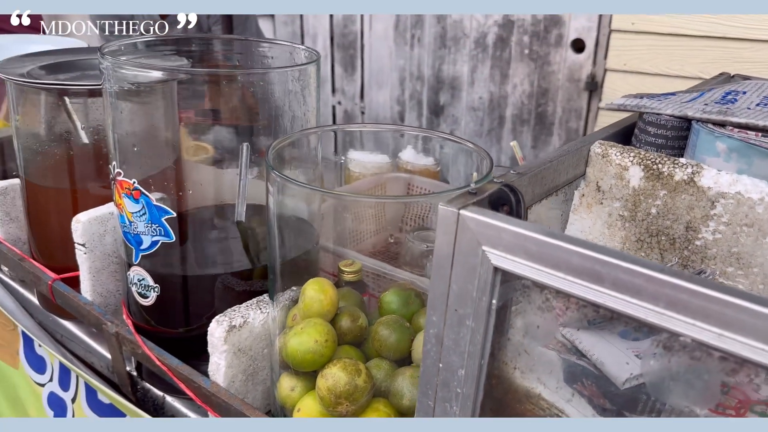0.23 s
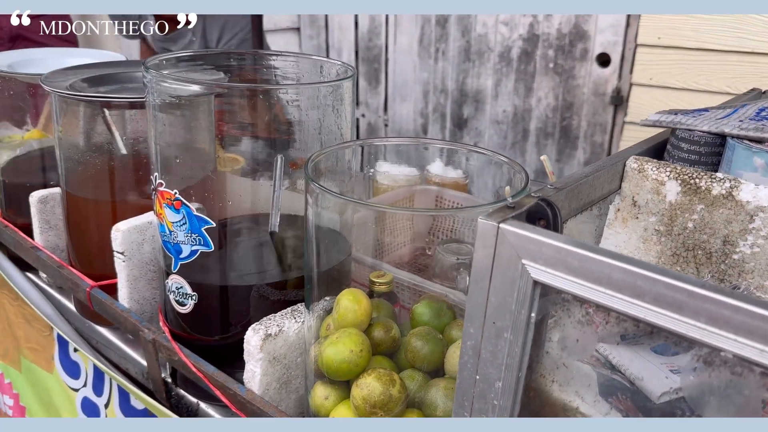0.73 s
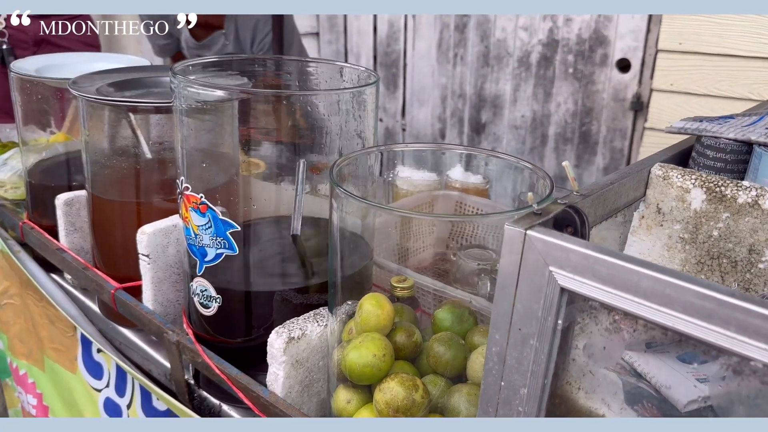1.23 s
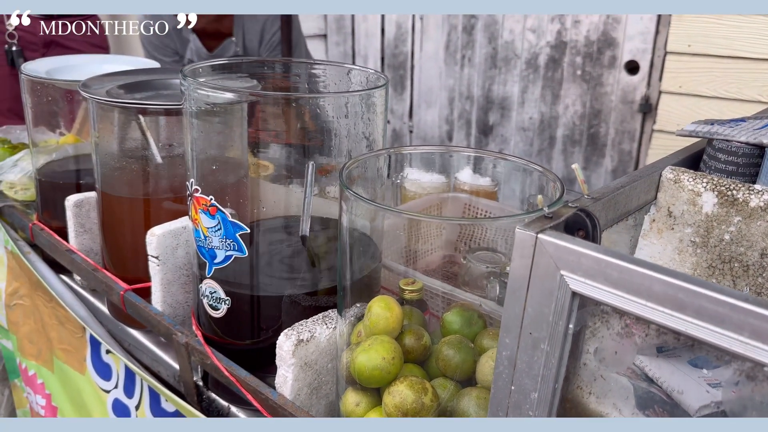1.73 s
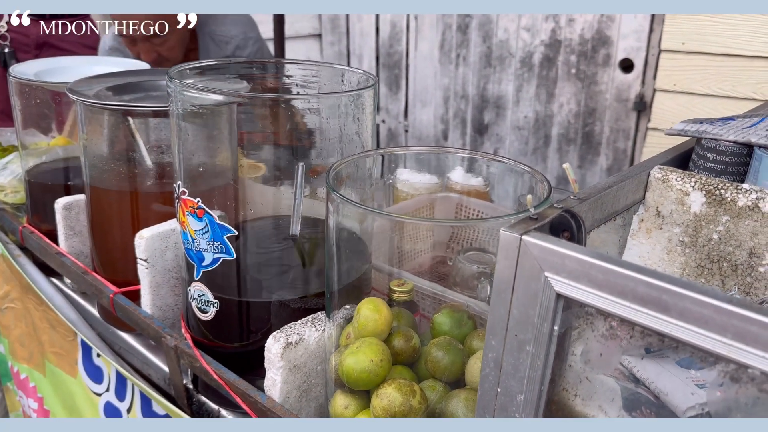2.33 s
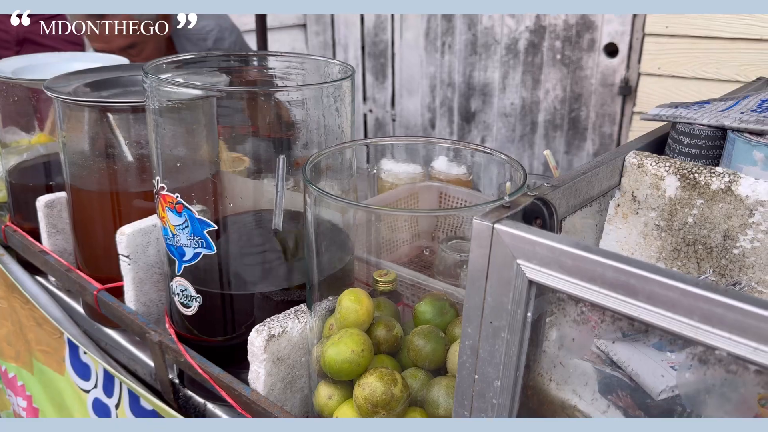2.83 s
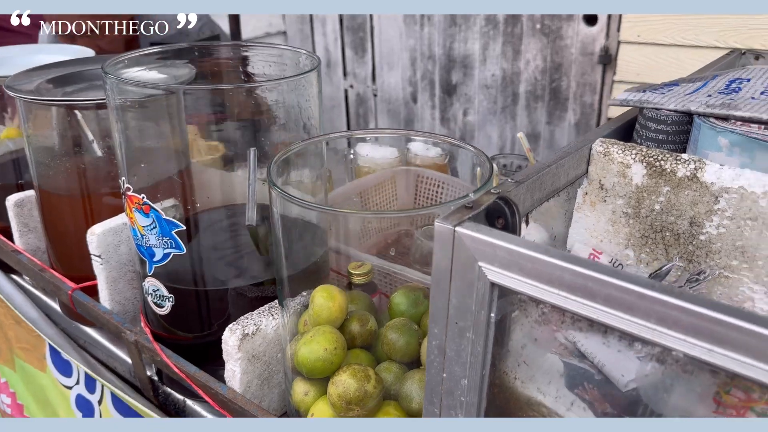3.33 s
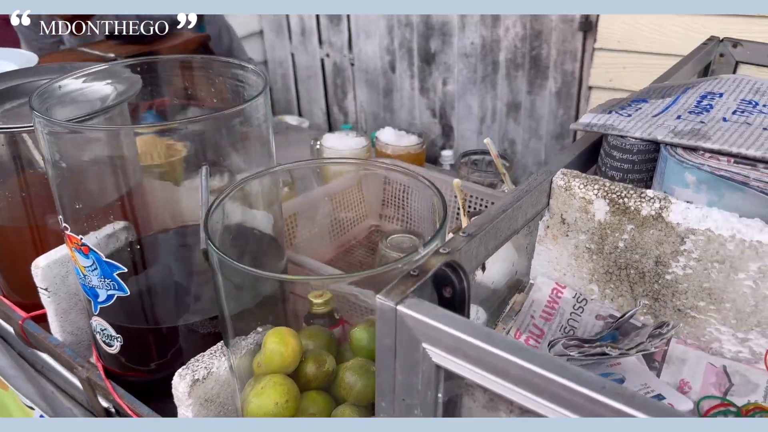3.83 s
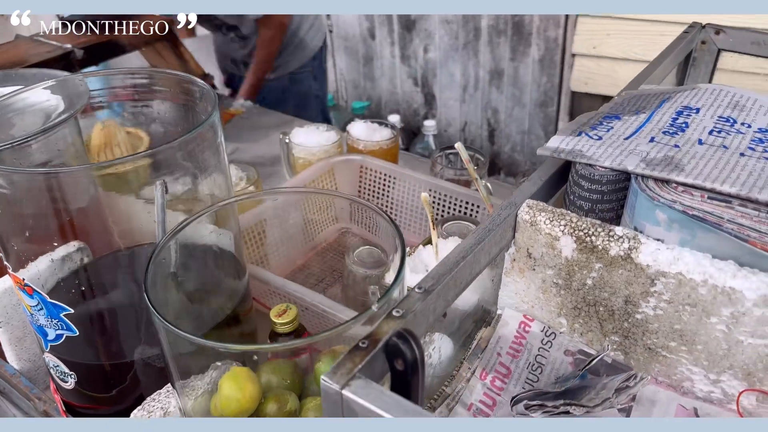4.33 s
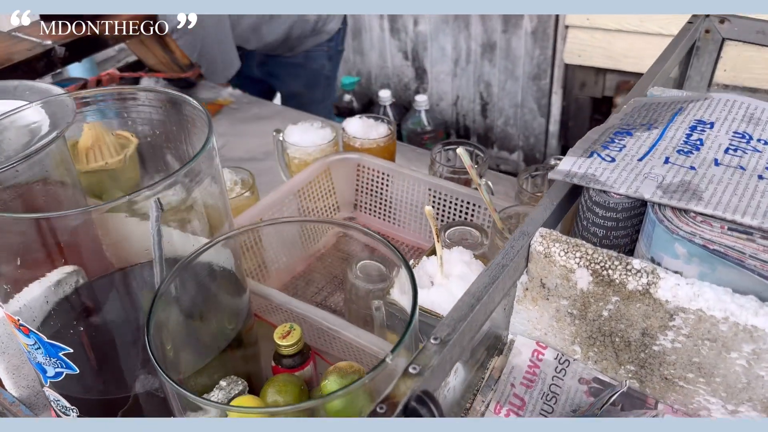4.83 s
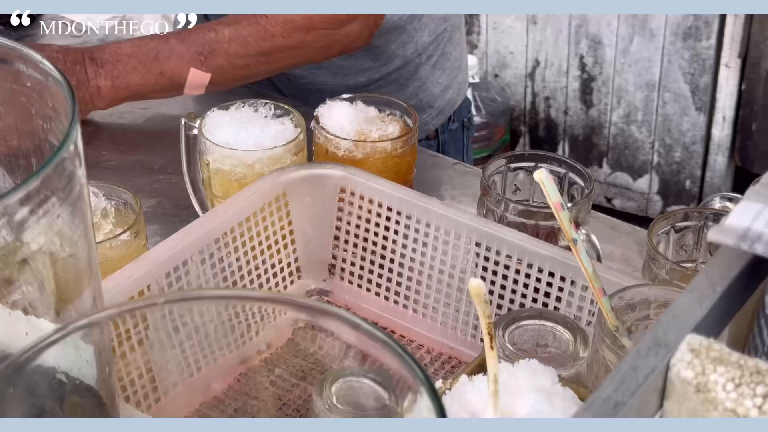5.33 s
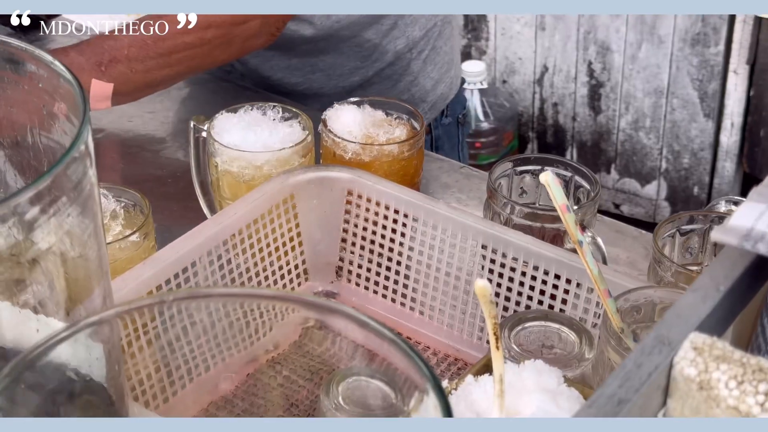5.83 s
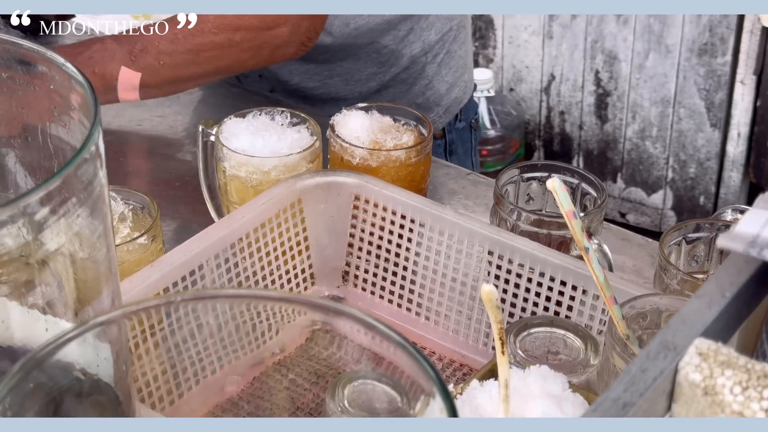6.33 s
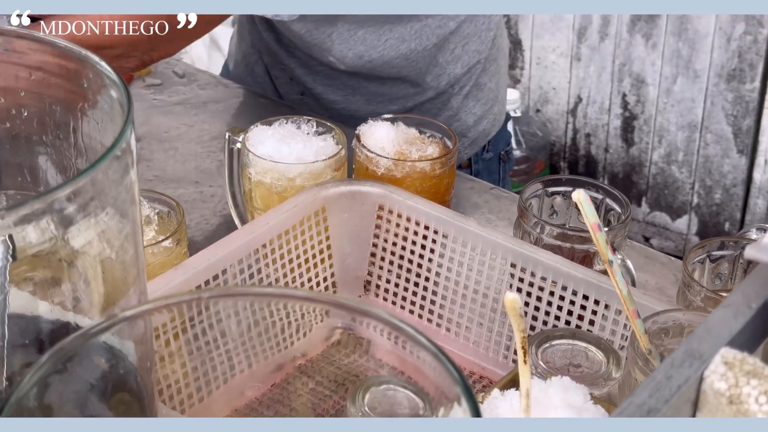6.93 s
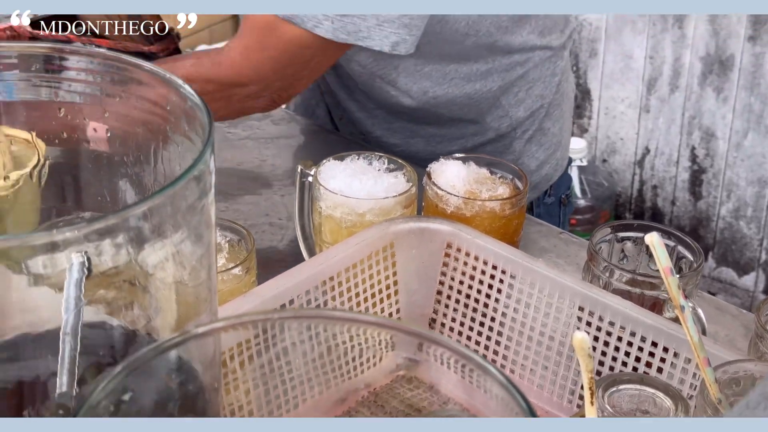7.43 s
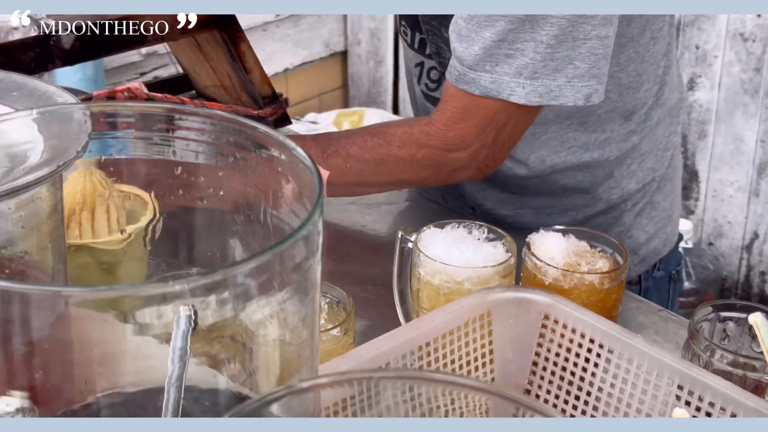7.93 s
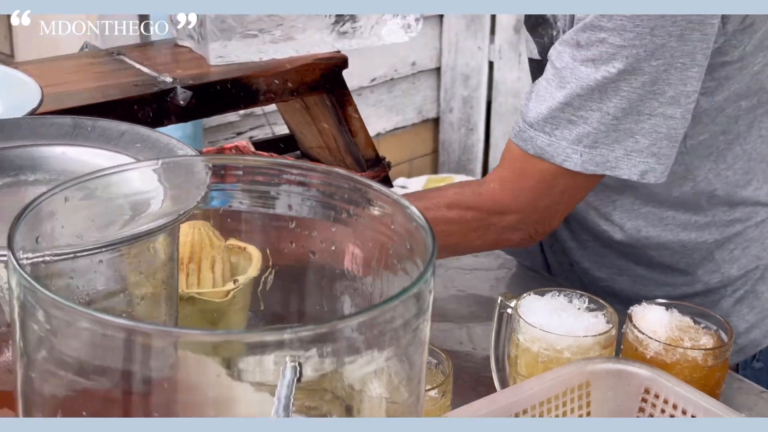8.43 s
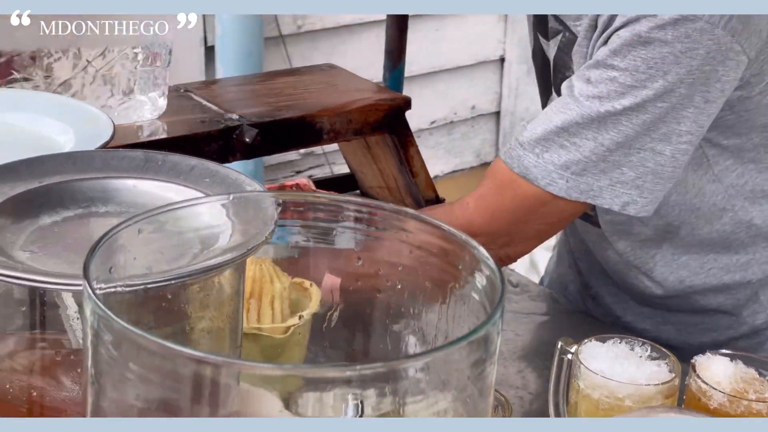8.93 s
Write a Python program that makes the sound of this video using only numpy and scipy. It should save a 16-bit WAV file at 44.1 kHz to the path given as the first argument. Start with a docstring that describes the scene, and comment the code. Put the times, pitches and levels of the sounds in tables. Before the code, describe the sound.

Street roar and tyre hiss with small ticks and knocks, then four harsh scraping pushes of ice over a wooden plane, lighter slides between.

```python
"""A street is heard first: roar and tyre hiss over a low rumble, a far motor, a few small ticks, knocks, scuffs.
Then, at a roadside drink stall, a block of ice is shaved by hand on a wooden plane: four hard pushes over
the blade, with lighter slides back between them. Street and bench are coloured noise; the ice is a dense
train of tiny fractures that rings the plank and throws off a bright spray of chips."""
import sys
import numpy as np
from scipy import signal
from scipy.fft import rfft, irfft
from scipy.io import wavfile

SR = 44100
rng = np.random.default_rng(int(sys.argv[2]) if len(sys.argv) > 2 else 0)


def dump_mix(stems):
    """Bounce the given channels to the path in sys.argv[1] as a 16-bit WAV at rate SR."""
    frames = np.atleast_2d(stems).T  # one column per channel
    limited = np.clip(frames, -1, 1)  # hard clip at full scale
    pcm = np.round(limited * 32767).astype(np.int16)
    wavfile.write(sys.argv[1], SR, pcm)


N = 404838
TIME, BINS = np.arange(N) / SR, np.fft.rfftfreq(N, 1 / SR)  # seconds, Hz


def amp(db):
    """Turns dB into a gain."""
    return 10 ** (np.asarray(db) / 20)


def unit(x):
    """Scales to rms 1."""
    return x / np.sqrt(np.mean(x ** 2) + 1e-20)


def read(points, hz):
    """Reads a spectrum on a log-frequency axis."""
    f, value = np.transpose(points)
    return np.interp(np.log(hz + 1), np.log(f + 1), value)


def curves(rows):
    """Each column of a table as a curve over the whole time."""
    s, *columns = np.transpose(rows)
    return [np.interp(TIME, s, c) for c in columns]


def latest(rows):
    """At every moment: the age of the latest event of a table, then its other columns."""
    table = np.transpose(rows)
    row = np.maximum(np.searchsorted(table[0], TIME) - 1, 0)
    start, *columns = table[:, row]
    return TIME - start, *columns


def envelope(age, rise, hold, t60):
    """Rises, holds until the given age, then dies away."""
    return np.clip(age / rise, 0, 1) * amp(-60 * np.clip((age - hold) / t60, 0, 2))


def blow(age, t60):
    """Envelope of a blow: at once there, then dying."""
    return (age >= 0) * amp(-60 * np.clip(age / t60, 0, 2))


def swells(rows):
    """Soft arches of level, one for each row."""
    return sum(amp(db) * np.sin(np.pi * np.clip((TIME - s) / length, 0, 1)) for s, length, db in rows)


def colour(x, spectrum):
    """Gives x a spectrum, at rms 1."""
    return unit(irfft(rfft(x) * amp(read(spectrum, BINS)), N))


def noise():
    """White noise, rms 1."""
    return rng.standard_normal(N)


def drift(hz):
    """Slow chance wandering up to a rate, rms 1."""
    return unit(irfft(rfft(noise()) / (1 + (BINS / hz) ** 4), N))


def resonate(x, hz, width):
    """A resonance of gain 1 that follows the curve hz: shift down, smooth, shift back up."""
    turn = np.exp(2j * np.pi * np.cumsum(hz) / SR)
    r = np.exp(-np.pi * width / SR)
    return 2 * (turn * signal.lfilter([1 - r], [1, -r], x / turn)).real


def shifting(x, patchy_db, span_hz, span_s):
    """Random patches of time and frequency swell and fade, so that ever other bands ring out for a moment."""
    z = signal.stft(x, SR, nperseg=512, noverlap=384)[2]
    per_s = np.fft.rfftfreq(z.shape[1], 128 / SR)
    per_hz = np.fft.fftfreq(len(z), SR / 512)[:, None]
    smooth = np.exp(-(per_s * span_s) ** 2 - (per_hz * span_hz) ** 2)
    patches = unit(np.fft.irfft2(np.fft.rfft2(rng.standard_normal(z.shape)) * smooth, z.shape))
    z = z * amp(patchy_db * np.minimum(patches, 2))
    return signal.istft(z, SR, nperseg=512, noverlap=384)[1][:N]


# How alike left and right are in the street. Each row: frequency in Hz, likeness from 0 to 1.
STREET_LIKENESS = [(60, 1), (150, 0.92), (300, 0.59), (700, 0.2), (1400, 0), (7000, 0.3), (8600, 1),
                   (16000, 0.96)]


def wide(spectrum):
    """Restless noise from all around, left and right sharing more or less of it in each band."""
    left, other = (rfft(shifting(noise(), 2.56, 220, 0.053)) for side in range(2))
    same = np.clip(read(STREET_LIKENESS, BINS), -1, 1)
    right = same * left + np.sqrt(1 - same ** 2) * other
    return colour(irfft(np.array([left, right]), N), spectrum)


# Resonances of the far motor's whine. Each row: pitch in Hz, width in Hz, level in dB before the fade.
MOTOR_WHINE = [(491.3, 10.7, -54.5), (1430, 37, -59.5)]
# The motor fades away. Each row: time in seconds, gain in dB before a fixed trim.
MOTOR_FADE = [(0, 4), (3.2, 3.5), (3.7, -1.5), (6, -7)]
WHINE_WIDTH = 0.66  # weight of the whine that is opposite in left and right


def far_motor():
    """Noise through narrow resonances gives an unsteady whine, which fades away."""
    both, apart = (sum(amp(db) * unit(resonate(noise(), np.full(N, hz), width))
                       for hz, width, db in MOTOR_WHINE) for part in range(2))
    whine = both + WHINE_WIDTH * np.outer([1, -1], apart)
    return amp(curves(MOTOR_FADE)[0] + 0.5) * whine


# A low hum that comes and goes. Each row: time in seconds, level in dB, pitch in Hz.
PASSING_HUM = [(3.4, -69, 210), (3.9, -54.5, 209.6), (5.25, -50, 207.9), (6, -65, 211)]


def passing_hum():
    """A sine with slightly wandering pitch and level."""
    hum_db, hum_hz = curves(PASSING_HUM)
    phase = 2 * np.pi * np.cumsum(hum_hz * (1 + 0.0077 * drift(11.1))) / SR
    return amp(hum_db + 0.62 * drift(6)) * unit(np.sin(phase))


# The street's rise and fall. Each row: time in seconds, roar in dB and tyre hiss in dB before fixed trims.
STREET_LEVELS = [(0.0, -44.5, -63), (0.13, -49, -57.5), (0.2, -42, -49.5), (0.72, -39.5, -44),
                 (0.82, -44, -53), (1.5, -45.5, -53), (2.1, -46.5, -57), (2.53, -47.5, -54),
                 (2.66, -41.5, -59), (2.9, -48, -57.5), (3.3, -48.5, -62), (4.2, -47, -66),
                 (5.3, -46.5, -68), (5.8, -50.5, -76), (9.18, -53, -95)]
# Short, bright rustles. Each row: start in seconds, length in seconds, peak level in dB before the flicker.
BRIGHT_RUSTLES = [(1.08, 0.11, -50), (1.55, 0.12, -49), (2.55, 0.23, -51), (4.785, 0.089, -45),
                  (4.91, 0.06, -49), (5.13, 0.1, -46.5)]
# Level of the low rumble, which rises once the shaving starts. Each row: time in seconds, level in dB.
LOW_RUMBLE_LEVEL = [(0, -41.5), (2, -44), (4.8, -45.5), (5.4, -39), (7.8, -38), (8.4, -39)]
# Colours of roar, hiss and low rumble. Each row: frequency in Hz, relative density in dB per Hz.
ROAR_COLOUR = [(100, -13), (250, -6.5), (320, -0.5), (420, 0), (620, -4.5), (900, -3), (1150, -9),
               (1600, -9.5), (2500, -11.5), (3300, -17.5), (8000, -26)]
HISS_COLOUR = [(500, -10), (1500, 6), (3000, 2.5), (5000, 2), (8000, -1.5), (11000, 1), (14500, -3),
               (16000, -2.5)]
LOW_RUMBLE_COLOUR = [(20, -14), (32, -12), (50, 1), (65, 0), (95, 2), (150, -1.5), (210, -6), (300, -13.5),
                     (600, -51)]


def street():
    """Low rumble, roar and tyre hiss as wide coloured noise, with rustles, far motor and hum."""
    roar_db, hiss_db = curves(STREET_LEVELS)
    roar = amp(roar_db + 2.0 + 0.53 * drift(28)) * wide(ROAR_COLOUR)
    hiss_gain = amp(hiss_db + 6.0) + swells(BRIGHT_RUSTLES)
    hiss = hiss_gain * amp(1.8 * drift(41)) * wide(HISS_COLOUR)
    low_rumble = amp(curves(LOW_RUMBLE_LEVEL)[0] + 0.2 * drift(7.2)) * wide(LOW_RUMBLE_COLOUR)
    return roar + hiss + low_rumble + far_motor() + passing_hum()


# Decay under the stall roof. Each row: frequency in Hz, t60 in seconds.
ROOF_DECAY = [(120, 0.85), (500, 0.16), (2000, 1), (6000, 0.77), (15000, 0.66)]


def room(x):
    """A faint tail from walls and roof, each band dying at its own speed."""
    hz, t, z = signal.stft(rng.standard_normal((2, SR)), SR, nperseg=256)
    dying = z * amp(-60 * t / read(ROOF_DECAY, hz)[:, None])
    tail = signal.istft(dying, SR, nperseg=256)[1]
    tail = tail[0] + np.array([[.3], [-.3]]) * tail[1]  # left and right differ a little
    return signal.fftconvolve(x[None], tail / np.linalg.norm(tail[0]), axes=1)[:, :N]


# What jars and counter scatter. Each row: frequency in Hz, gain in dB.
JAR_SCATTER = [(250, -14), (550, -5), (900, -10), (1500, -8), (2000, -12), (2600, -60), (3500, -38),
               (6000, -80)]


def scattered(x, count=8):
    """Early bounces off jars and counter, opposite in left and right."""
    delays = rng.uniform(.001, .014, count)  # seconds
    bounces = np.exp(-2j * np.pi * np.outer(delays, BINS)).sum(0) / np.sqrt(count)
    return np.outer([1, -1], irfft(rfft(x) * bounces * amp(read(JAR_SCATTER, BINS)), N))


# Modes of plank and blade. Each row: pitch in Hz, width in Hz, gain in dB against the direct sound.
PLANK_MODES = [(456, 55, -6.5), (825, 21, 4), (1093, 24, 2.5), (1258, 31, 2), (1398, 21, 4), (1552, 23, 10),
               (1840, 18, 7), (1970, 26, 7), (2127, 24, 7), (2190, 50, -6), (2418, 23, 7), (2667, 20, 10),
               (3300, 28, 5), (3725, 27, 3.5), (4190, 33, -0.5), (4715, 39, 1.5), (4990, 62, -2),
               (5700, 27, -15), (5910, 24, 3), (6100, 28, 4), (6200, 32, -6), (7000, 40, 1), (7500, 40, -7),
               (8060, 120, -4)]


def plank(x):
    """The modes of the plane ring with whatever excites it."""
    return x + sum(amp(db) * signal.lfilter(*signal.iirpeak(hz, hz / width, SR), x)
                   for hz, width, db in PLANK_MODES)


def fractures(per_s, spread_db, clump_db, clump_hz):
    """Tiny breaks of uneven size, which come in clumps as the ice sticks and slips."""
    size = amp(spread_db * np.minimum(rng.exponential(1, N), 4) + clump_db * drift(clump_hz))
    happens = rng.random(N) < per_s / SR
    return unit(size * rng.choice([-1, 1], N) * happens)


# Hard ticks of ice and utensils. Each row: start in seconds, crack in dB, ring in dB, before fixed trims.
HARD_TICKS = [(0.2313, -26, -37), (1.4336, -33, -56), (1.8337, -35, -43), (1.934, -23, -36.5),
              (2.336, -33, -47), (2.5215, -32, -56), (3.5124, -31, -47), (4.793, -38, -40), (6.2, -31, -46),
              (6.29, -25, -32), (6.335, -22, -34), (6.3684, -24, -25.5), (6.4068, -17, -22.5),
              (6.493, -23, -23.5), (6.601, -10, -22), (7.2612, -26, -35), (8.1637, -26, -26.5)]
# Dull knocks on wood. Each row: start in seconds, level in dB before a fixed trim, t60 in seconds.
WOOD_KNOCKS = [(0.036, -29, 0.084), (0.232, -33, 0.088), (0.629, -28, 0.19), (1.119, -27.5, 0.13),
               (1.141, -32, 0.12), (1.834, -27, 0.12), (1.935, -32, 0.11), (5.344, -29.5, 0.043),
               (6.603, -29, 0.07), (7.352, -24, 0.23)]
# Scuffs on the counter. Each row: start in seconds, length in seconds, peak level in dB.
COUNTER_SCUFFS = [(4.225, 0.18, -38), (4.79, 0.13, -47), (4.885, 0.072, -41)]
# Colours of tick, knock and scuff. Each row: frequency in Hz, relative density in dB per Hz.
TICK_COLOUR = [(900, -14), (1600, -11), (2800, -6.5), (4200, 1.5), (6000, -1.5), (8500, 3), (12000, -2),
               (16000, -2)]
KNOCK_COLOUR = [(40, -9), (110, -1.5), (300, 0), (520, -1), (800, -6), (1600, -18.5), (4000, -26),
                (16000, -62)]
SCUFF_COLOUR = [(200, -27), (500, -5), (720, 3), (1100, -3.5), (1550, -5), (2100, -13.5), (5000, -23),
                (15000, -19.5)]
CRACK_T60_S, RING_T60_S = 0.012, 0.051


def handling():
    """Dying noise bursts make bright ticks and dull knocks; clumped grit makes soft scuffs."""
    age, crack_db, ring_db = latest(HARD_TICKS)
    cracks = amp(crack_db) * blow(age, CRACK_T60_S)
    rings = amp(ring_db) * blow(age, RING_T60_S)
    ticks = amp(-5) * cracks * colour(noise(), TICK_COLOUR)
    ticks = ticks + amp(3.0) * rings * colour(plank(noise()), TICK_COLOUR)
    knocks = sum(amp(db) * blow(TIME - s, t60) for s, db, t60 in WOOD_KNOCKS)
    thuds = amp(-3.5) * knocks * colour(noise(), KNOCK_COLOUR)
    grit = fractures(per_s=3700, spread_db=2.0, clump_db=2.5, clump_hz=80)
    scuffs = swells(COUNTER_SCUFFS) * colour(shifting(grit, 5.7, 200, 0.053), SCUFF_COLOUR)
    return ticks + thuds + scuffs


# Jolts of the bench. Each row: start in seconds, level in dB before the shake's own mix.
BENCH_JOLTS = [(5.335, -34.5), (5.775, -40), (6.6, -29.5), (7.48, -28.5), (8.36, -28.5)]
# Colour of the rumble. Each row: frequency in Hz, relative density in dB per Hz.
BENCH_COLOUR = [(25, -25), (50, -8), (75, -5.5), (110, 2), (160, -2), (240, -3), (400, -6.5), (650, -19),
                (1500, -38)]
BENCH_PUSH_DB, BENCH_SLIDE_DB = -13, -8.5  # against the stroke's level, before the shake's own mix
BENCH_RISE_S, BENCH_T60_S = 0.067, 1.9
BENCH_REST_HZ, BENCH_LOAD_HZ, BENCH_RELAX_S = 107.4, 35, 0.8  # resonance rises under load, sinks back
JOLT_RISE_S, JOLT_T60_S = 0.017, 0.84


def bench():
    """The bench rumbles under strokes and jolts; pushes and jolts load it and raise its resonance."""
    pushed = sum(amp(db + BENCH_PUSH_DB) * envelope(TIME - s, BENCH_RISE_S, length, BENCH_T60_S)
                 for s, length, db, *rest in HARD_PUSHES)
    slid = sum(amp(db + BENCH_SLIDE_DB) * envelope(TIME - s, BENCH_RISE_S, length, SLIDE_T60_S)
               for s, length, db, *rest in LIGHT_SLIDES)
    jolt_age, jolt_db = latest(BENCH_JOLTS)
    jolt = envelope(jolt_age, JOLT_RISE_S, JOLT_RISE_S, JOLT_T60_S)
    age, length, *rest = latest(HARD_PUSHES)
    load = np.maximum(envelope(age, BENCH_RISE_S, length, BENCH_RELAX_S), jolt)
    hz = BENCH_REST_HZ + BENCH_LOAD_HZ * load
    boom = unit(resonate(resonate(noise(), hz, 19), hz, 19))
    rumble = colour(shifting(noise(), 2.5, 89, 0.13), BENCH_COLOUR)
    shake = amp(-5.0) * boom + amp(-4.0) * rumble
    return np.sqrt(pushed ** 2 + slid ** 2 + (amp(jolt_db) * jolt) ** 2) * shake


# Light slides back. Each row: start in seconds, length in seconds, level halfway in dB before the layer
# mix, swell from start to end in dB, plank in dB against that level, rasp pitch halfway in Hz.
LIGHT_SLIDES = [(6.252, 0.36, -36.5, 15.5, -9, 3270), (7.258, 0.22, -26.5, -7, -7, 2940),
                (8.158, 0.18, -31.5, 9.5, -3, 3100), (9.1, 0.085, -53.5, 20, -10, 3430)]
# The block catches for a moment. Each row: start in seconds, rasp in dB before its own mix, spray in dB.
BLOCK_CATCHES = [(6.406, -27.5, -35), (6.527, -22, -27), (6.558, -31, -30), (6.597, -16, -21),
                 (7.305, -33, -30), (8.16, -39, -28)]
# Colours of plank body (pushes too), rasp and loose chips. Each row: frequency in Hz, relative dB per Hz.
CUT_COLOUR = [(100, -47), (220, -13), (450, -1), (760, -8.5), (1050, 3), (1700, -4), (2800, -2), (4200, -3),
              (8000, -19), (16000, -32)]
RASP_COLOUR = [(950, -25), (1400, -8.5), (2100, -3), (3000, 1.5), (4200, -4), (6500, -2), (12000, -31)]
LIGHT_SPRAY_COLOUR = [(1000, -50), (2000, -20), (3300, -4), (4600, -3.5), (6500, 1), (8500, -0.5),
                      (11000, 1), (14500, -1.5), (16000, -2)]
TOUCH_S, SLIDE_T60_S = 0.0019, 0.12
SLIDE_ARCH_DB = 2  # both ends of a slide are softer by this, apart from the swell
SLIDE_PATCHY_DB = 4.5  # how unevenly the bands of the spray ring out
RASP_RISE_PER_DB = 0.5  # pitch glide over a slide, as a share of the halfway pitch per dB of swell
CATCH_RISE_S, CATCH_HOLD_S, CATCH_T60_S = 0.0055, 0.011, 0.081


def slides():
    """Drawn back, the block only rubs: a thinner, grainy hiss with a gliding rasp that flares where it catches."""
    age, length, halfway_db, swell_db, plank_db, halfway_hz = latest(LIGHT_SLIDES)
    way = np.clip(age / length, 0, 1) - .5  # -0.5 at the start, 0.5 at the end
    rub_db = halfway_db + swell_db * way - SLIDE_ARCH_DB * (2 * way) ** 2
    rub = envelope(age, TOUCH_S, length, SLIDE_T60_S) * amp(rub_db)
    # a steep glide: values below zero sound at their mirrored pitch
    rasp_hz = halfway_hz * (1 + RASP_RISE_PER_DB * swell_db * way)
    catch_age, rasp_db, spray_db = latest(BLOCK_CATCHES)
    catch = envelope(catch_age, CATCH_RISE_S, CATCH_HOLD_S, CATCH_T60_S)
    breaks = fractures(per_s=6000, spread_db=0.5, clump_db=2.1, clump_hz=111)
    chips = fractures(per_s=12000, spread_db=-2.0, clump_db=1.8, clump_hz=140)
    body = colour(shifting(plank(breaks), 1.5, 230, 0.036), CUT_COLOUR)
    band = colour(resonate(breaks, rasp_hz, 700), RASP_COLOUR)
    chatter = unit(resonate(band, rasp_hz * (1 + 0.045 * drift(40.0)), 250))
    scratch = shifting(breaks, 2.0, 1200, 0.006)
    rasp = amp(-6.5) * colour(scratch, RASP_COLOUR) + amp(-13.5) * chatter
    spray = colour(shifting(plank(chips), SLIDE_PATCHY_DB, 410, 0.049), LIGHT_SPRAY_COLOUR)
    rubbing = rub * (amp(plank_db) * body + amp(-3) * rasp + amp(3.0) * spray)
    return rubbing + catch * (amp(rasp_db) * rasp + amp(spray_db) * spray)


# Hard pushes over the blade. Each row: start in seconds, length in seconds, cut at its hardest in dB and
# spray of fine chips in dB (both before the layer mix), share of the way where it is hardest,
# first chatter pitch in Hz.
HARD_PUSHES = [(5.395, 0.24, -18, -17.5, 0.6, 2320), (6.822, 0.23, -19.5, -17.5, 0.67, 2380),
               (7.659, 0.28, -17.5, -18.5, 0.52, 1760), (8.568, 0.24, -18.5, -20, 0.49, 1780)]
# Colour of the chips. Each row: frequency in Hz, relative density in dB per Hz.
SPRAY_COLOUR = [(300, -9), (1200, -13), (2200, -7.5), (3200, -2.5), (4500, 0), (6300, 0.5), (8500, -1.5),
                (11000, -0.5), (14500, -2.5), (16000, -4)]
BITE_S, PUSH_T60_S = 0.015, 0.12  # the blade bites at once and lets go more slowly
EASE_DB, SPRAY_SAG_DB = 22.5, 3.5  # cut eases with squared distance from its hardest; spray thins along the way
LAST_CHATTER_HZ = 1800  # every push ends near this pitch


def pushes():
    """The blade cuts: fractures drive the plank, a chattering band and a spray of chips."""
    age, length, top_db, first_spray_db, hardest, first_hz = latest(HARD_PUSHES)
    way = np.clip(age / length, 0, 1)
    cut_db = top_db - EASE_DB * (way - hardest) ** 2
    spray_db = first_spray_db - SPRAY_SAG_DB * way
    chatter_hz = first_hz + (LAST_CHATTER_HZ - first_hz) * way
    breaks = fractures(per_s=9000, spread_db=1.0, clump_db=0.9, clump_hz=130)
    chips = fractures(per_s=16000, spread_db=4.0, clump_db=0.5, clump_hz=160)
    chatter = unit(resonate(breaks, chatter_hz * (1 + 0.17 * drift(29)), 280))
    body = colour(shifting(plank(breaks), 3.35, 330, 0.035), CUT_COLOUR)
    cut = amp(-2) * body + amp(-7.5) * chatter
    spray = colour(shifting(plank(chips), 3.3, 320, 0.041), SPRAY_COLOUR)
    stroke = envelope(age, BITE_S, length, PUSH_T60_S)
    return stroke * (amp(cut_db) * cut + amp(spray_db + 3.5) * spray)


# Where the plane stands. Each row: frequency in Hz, left minus right in dB.
PLANE_SIDE = [(300, -.5), (480, -.5), (770, 4.5), (1170, 6.3), (1790, 2.2), (2600, 0)]


def scene():
    """The plane stands a little to the left, under a roof, in the noise of the street."""
    ice = pushes() + slides() + handling()
    placed = irfft(rfft(ice) * amp(np.outer([.5, -.5], read(PLANE_SIDE, BINS))), N)
    return street() + bench() + placed + scattered(ice) + amp(-25.0) * room(ice)


# Phase between left and right in the top treble. Each row: frequency in Hz, phase in half turns.
TREBLE_PHASE = [(8300, 0), (9480, 1), (11100, 2), (12680, 3), (14120, 4), (15600, 5)]
EDGE_HZ = 15700  # top of the band


def record(dry):
    """In the top treble left and right turn in and out of phase; then a steep low-pass ends the band."""
    phase = np.pi * np.interp(BINS, *np.transpose(TREBLE_PHASE))
    sides = irfft(rfft(dry) * np.exp(1j * np.outer([-.5, .5], phase)), N)
    low_pass = signal.firwin(301, EDGE_HZ, window=("kaiser", 9), fs=SR)
    return signal.oaconvolve(sides, low_pass[None], "same")


dry = scene()
out = record(dry)
dump_mix(out)
```